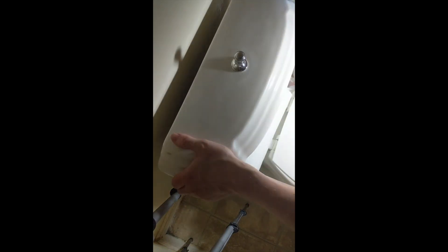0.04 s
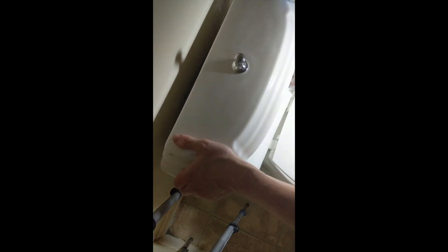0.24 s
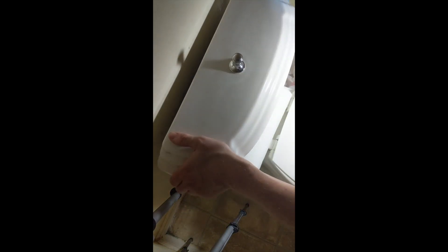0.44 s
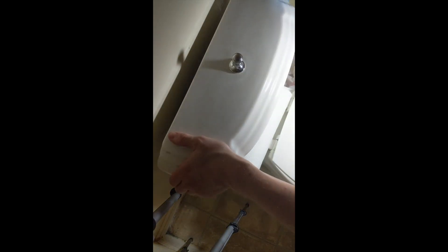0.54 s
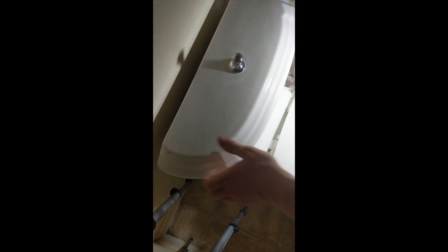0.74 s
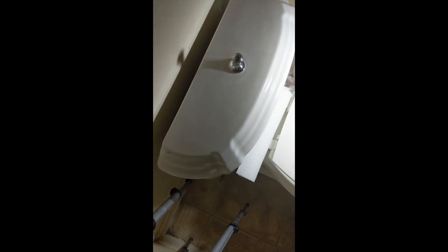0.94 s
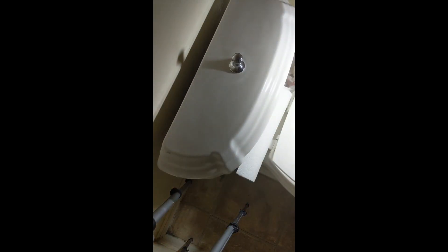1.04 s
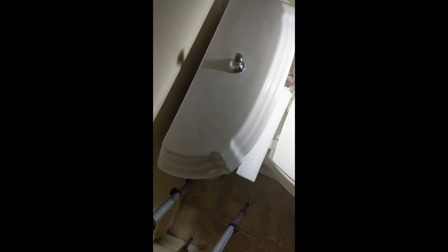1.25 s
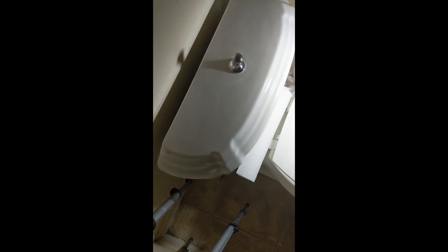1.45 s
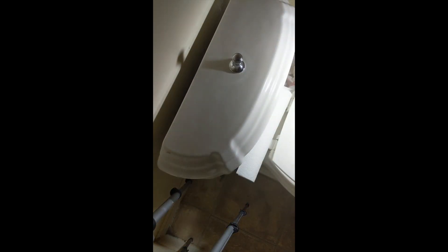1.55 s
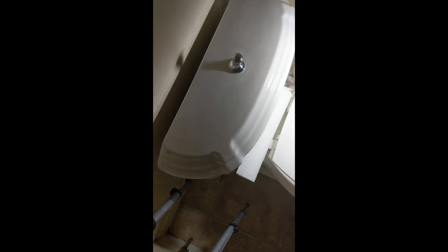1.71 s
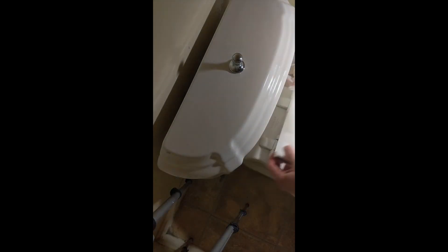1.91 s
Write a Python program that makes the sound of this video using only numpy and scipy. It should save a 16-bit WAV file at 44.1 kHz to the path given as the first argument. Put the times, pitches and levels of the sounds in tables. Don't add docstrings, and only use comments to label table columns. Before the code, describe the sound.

Four hard ceramic clunks in quick succession as a toilet tank lid settles onto its rim, after a short soft scrape; then near quiet with tiny drips, faint valve hiss and light finger taps, close-up in a tiled bathroom.

```python
import sys
import numpy as np
from scipy import signal
from scipy.fft import rfft, irfft, next_fast_len
from scipy.io import wavfile
from scipy.ndimage import uniform_filter1d, map_coordinates

SR = 44100
rng = np.random.default_rng(int(sys.argv[2]) if len(sys.argv) > 2 else 0)


def wrap_up_sound(samples):
    columns = np.atleast_2d(samples).T
    tamed = np.clip(columns, -1, 1)
    steps = np.round(tamed * 32767).astype(np.int16)
    wavfile.write(sys.argv[1], SR, steps)


def gain_from_db(level_db):
    decades = np.asarray(level_db, float) / 20
    return 10 ** decades


N = 85995

# pitch_hz, level_db (per Hz)
AIR_SPECTRUM = [(15, -62), (25, -17), (49, -0.5), (130, 2), (516, -12), (840, -15), (1790, -21),
                (3160, -20), (16000, -26.5)]
# pitch_hz, level_db
CAVITY_MODES = [(1020, 4.5), (1340, 5.5), (1800, 6.5), (2050, -3), (2350, -1.5), (3600, -2.5), (4600, -9)]
# pitch_hz, t60_s
TILE_DECAY = [(150, 0.38), (1000, 0.14), (4000, 0.17), (12000, 0.078)]
# pitch_hz, level_db (per Hz)
PHONE_FLOOR = [(20, 13), (60, -18), (100, -43)]
# start_s, peak_db, pitch_hz, t60_s
PLINK_EVENTS = [(.744, -58, 2230, 0.099), (.7453, -53.5, 2050, 0.19), (.976, -60.5, 2320, 0.071),
                (.985, -60.5, 2050, 0.2), (1.0422, -59.5, 2043, 0.1), (1.0422, -65, 1730, .08),
                (1.209, -59.5, 2360, 0.15), (1.22, -59.5, 2354, 0.28), (1.242, -60, 2054, 0.18),
                (1.285, -64, 2090, 0.055), (1.283, -65.5, 1520, 0.17), (1.326, -56, 2070, 0.09),
                (1.326, -57, 1600, .04), (1.328, -63, 2362, 0.11), (1.343, -61, 1710, 0.078),
                (1.4367, -60.5, 2350, .1), (1.781, -61, 2350, .06), (1.788, -51.5, 2076, 0.055),
                (1.812, -64, 2350, 0.23), (1.909, -62, 2330, 0.096), (1.9223, -53, 2350, .03)]
# start_s, peak_db, pitch_hz
DROPLET_EVENTS = [(0.0074, -46.5, 4420), (0.094, -46.5, 5380), (0.1024, -46.5, 7900), (0.154, -48.5, 11400),
                  (0.1753, -43.5, 11660), (0.642, -56, 7370), (0.6635, -57, 6640), (0.733, -52.5, 7330),
                  (0.7858, -51, 4680), (.8, -58, 4700), (0.85, -49.5, 8730), (1.152, -51, 9370),
                  (1.172, -55, 7180), (1.523, -51.5, 4680), (1.695, -56, 9330), (1.717, -57, 5260),
                  (1.757, -58, 5900), (1.8762, -50, 7320), (.353, -48, 3500), (.958, -56.5, 5300),
                  (.645, -57, 2900), (1.24, -58.5, 5870), (1.453, -58, 10400), (0.571, -65.5, 6120),
                  (.89, -61.5, 8100), (.535, -64, 8650)]
# start_s, level_db, pitch_hz
SPLASH_EVENTS = [(0.65, -64, 13500), (0.66, -52, 11570), (0.94, -65, 14000), (1.232, -63, 13500),
                 (1.341, -60, 13400), (1.418, -65, 15000), (1.435, -65, 15000), (1.452, -62.5, 7000),
                 (0.61, -67, 5600), (0.68, -69, 10400), (0.86, -56, 8640)]
# start_s, level_db, push_ms, ring_db
HAND_BUMPS = [(.108, -47.5, 1.6, -5), (1.5607, -55, 2.6, 6.5), (1.568, -54, 3, 0.5), (1.576, -58, 2.8, 5),
              (1.588, -48, 3.3, -7), (1.649, -54.5, 0.49, -0.5), (1.6546, -44.5, 1.2, -4),
              (1.663, -45, 2, -13), (1.6808, -48.5, 1.43, -6), (1.8785, -33, 3.74, -12),
              (1.899, -63, 2.7, -6)]
# pitch_hz, width_hz, level_db
FLESH_MODES = [(251, 99, 0.5)]
# pitch_hz, width_hz, level_db
TANK_MODES = [(155, 13, 0.5), (239, 17.6, 6.5), (294, 11, 1.5), (403.8, 4.8, 9.5), (454, 12, 4.5),
              (1117, 25, 2)]
# start_s, level_db, length_s
BRUSH_EVENTS = [
    (0.302, -52, 0.019),
    (0.35, -56, 0.02),
    (1.552, -63.5, 0.015),
    (1.63, -66, 0.041),
    (1.668, -66, 0.018),
    (1.86, -63.5, 0.045),
    (1.904, -67, 0.038),
]
# pitch_hz, level_db (per Hz)
SKIN_SPECTRUM = [(800, 0), (3000, -2.5), (16000, -8.5)]
# start_s, peak_db, pitch_hz
GLAZE_TICKS = [
    (1.5565, -60, 3950),
    (1.604, -55, 4340),
    (1.648, -61, 3650),
    (1.669, -54.5, 4500),
    (1.6704, -54, 6700),
    (1.886, -60, 3050),
    (1.9037, -50.5, 1600),
    (1.903, -56, 5760),
]
# start_s, scrape_db, palm_db
SLIDE_STROKE = [
    (0, -61.5, -68),
    (.04, -62, -69),
    (.09, -63.5, -58.5),
    (.115, -55.5, -70),
    (.16, -53.5, -69),
    (.19, -61.5, -58.5),
    (0.237, -58, -58.5),
]
# pitch_hz, level_db (per Hz)
GRIT_SPECTRUM = [(60, -38), (140, 2), (300, -27), (700, -36), (1300, -11.5), (2500, -21), (5000, -21),
                 (16000, -31.5)]
# pitch_hz, level_db (per Hz)
PALM_SPECTRUM = [(3000, -18), (8000, -1.5), (11500, 8), (16000, 8)]
# start_s, peak_db, contact_ms, clatter_db
CORNER_BLOWS = [
    (0.239, -14, 0.46, 2),
    (0.3166, -17.5, 1.1, 3),
    (0.3793, -15.5, 0.042, 2.5),
    (0.4272, -16, 0.02, 3.5),
]
# pitch_hz, level_db, t60_s
CORNER_MODES = [
    [(147, -18.5, 0.14), (284, -20, 0.032), (480.5, -5.5, 0.057), (600.5, -3.5, 0.047), (1147, 0.5, 0.044),
     (1301.3, -7, 0.18), (1557, -3.5, 0.07), (1830, -6.5, 0.041), (2360, -14, 0.046), (2438, -1.5, .11),
     (2702, 5.5, 0.029), (3040, -42, 0.09), (4409, -6, 0.023), (6160, -30, 0.11)],
    [(149.8, -4.5, 0.21), (300, -11, 0.094), (437, -13, 0.087), (459.8, 3.5, 0.088), (752, -18.5, 0.12),
     (890, -11, 0.045), (1055, 5, 0.034), (1203, -5, 0.1), (1290, 1.5, 0.17), (1540, -17, 0.02),
     (1790, -19, 0.11), (2040, -26, 0.052), (2440, -25, 0.26)],
    [(142.6, -16, 0.38), (453, -3.5, 0.1), (1121, 5, 0.047), (1290, -11, 0.3), (1768, -15, 0.093),
     (2450, -1.5, 0.12), (2765, 4.5, 0.037), (3540, -15.5, 0.038), (4400, -10, 0.098), (5630, -23.5, 0.077),
     (6067, -19, 0.1), (6821, -18, 0.073), (8080, -16.5, 0.076), (12000, -33, .04)],
    [(150.5, -2.5, 0.099), (103.3, -18, 0.52), (407, -18, 0.11), (1011.6, -10.5, 0.25), (1202, 8, 0.028),
     (1304, -0.5, 0.097), (1804, -3.5, 0.12), (2418, -1.5, 0.15), (2978, 5, 0.024), (3596, -6, 0.052),
     (2517, -8.5, 0.17), (230, -3, 0.048), (6300, -24, 0.097), (8053, -15, 0.043)],
]
# delay_s, level_db
CORNER_RETOUCHES = [
    [(0.0143, -10)],
    [],
    [],
    [(.0069, -7.5), (.0114, -9.5), (.0162, -6)],
]
# pitch_hz, level_db (per Hz)
CLATTER_SPECTRUM = [(85, -17), (150, 11), (600, 12), (1300, 15.5), (2600, 13), (5000, -0.5), (9000, -17.5),
                    (16000, -20)]
# pitch_hz, t60_s
CLATTER_DECAY = [(150, 0.1), (1500, 0.052), (5000, 0.096), (14000, 0.058)]

TOP_HZ = 16070


def unit(x):
    return x / np.sqrt(np.mean(x ** 2) + 1e-20)


def along(points, hz):
    f, v = np.transpose(points)
    return np.interp(np.log(hz + 1), np.log(f + 1), v)


def wobble(rate):
    knots = rng.standard_normal(int(N * rate / SR) + 4)
    return map_coordinates(knots, [np.arange(N) * rate / SR])


def filtered(x, response):
    m = next_fast_len(len(x) + SR // 2)
    return irfft(rfft(x, m) * response(np.fft.rfftfreq(m, 1 / SR)), m)[:len(x)]


def resonant(peaks):
    def response(f):
        total = 0
        for k, (centre, width, db) in enumerate(peaks):
            damping = 1j * f * width
            total = total + (-1) ** k * gain_from_db(db) * damping / (centre * centre - f * f + damping)
        return total
    return response


def add(track, s, sound):
    part = track[round(s * SR):][:len(sound)]
    part += sound[:len(part)]


def dying(t60s, colour):
    hz, t, z = signal.stft(rng.standard_normal(SR // 2), SR, nperseg=128)
    level_db = along(colour, hz)[:, None] - 60 * t / along(t60s, hz)[:, None]
    tail = signal.istft(z * gain_from_db(level_db), SR, nperseg=128)[1]
    return tail / np.linalg.norm(tail)


def patchy(spectrum, patchy_db):
    z = signal.stft(rng.standard_normal(N), nperseg=512)[2]
    field = uniform_filter1d(rng.standard_normal(z.shape), size=8, axis=0)
    field = uniform_filter1d(field, size=5, axis=1)
    x = signal.istft(z * gain_from_db(patchy_db * unit(field)), nperseg=512)[1][:N]
    return unit(filtered(x, lambda hz: gain_from_db(along(spectrum, hz))))


def air():
    hiss = patchy(AIR_SPECTRUM, patchy_db=1.58)
    flow = rng.standard_normal(N) * gain_from_db(4.2 * wobble(25.66))
    hollow = unit(filtered(flow, resonant([(hz, hz / 40, db) for hz, db in CAVITY_MODES])))
    return gain_from_db(-64.32) * (hiss + gain_from_db(-9) * hollow)


def room(x):
    out, hop = np.zeros(N), 2048
    for a in range(0, N, hop):
        tail = dying(TILE_DECAY, [(100, 0)])
        add(out, (a + 130) / SR, signal.fftconvolve(x[a:a + hop], tail))
    return out


def splash(db, hz):
    t = np.arange(SR // 16) / SR
    puff = filtered(rng.standard_normal(len(t)), resonant([(hz, 0.16 * hz, 0)]))
    return gain_from_db(db - 60 * t / 0.034) * (1 - np.exp(-t / 0.0022)) * unit(puff)


def spray():
    out = np.zeros(N)
    for s, db, hz in SPLASH_EVENTS:
        add(out, s, splash(db, hz))
    for when, pitch, energy in rng.random((70, 3)):
        hz = min(10400 * 2.2 ** (2 * pitch - 1.4), TOP_HZ)
        add(out, when * N / SR, splash(-79 + 5 * energy ** 2, hz))
    return out


def bubble(hz, t60, spread):
    t = np.arange(round(.15 * SR)) / SR
    near_hz = hz * (1 + spread * rng.standard_normal(4))
    gain = gain_from_db(-11.5 + 7.6 * rng.random(4))
    late_s = 0.013 * rng.random(4)
    main = np.sin(2 * np.pi * hz * t) * gain_from_db(-60 * t / t60) * (1 - np.exp(-t / 0.00069))
    u = np.maximum(t - late_s[:, None], 0)
    neighbours = np.sin(2 * np.pi * near_hz[:, None] * u) * gain_from_db(-60 * u / (0.41 * t60))
    return main + (gain[:, None] * neighbours).sum(0)


def water():
    out = spray()
    for s, db, hz, t60 in PLINK_EVENTS:
        add(out, s, gain_from_db(db - 3.0) * bubble(hz, t60, spread=0.045))
    for s, db, hz in DROPLET_EVENTS:
        add(out, s, gain_from_db(db - 6) * bubble(hz, 0.037, spread=0.04))
    for when, pitch, energy in rng.random((90, 3)):
        add(out, when * N / SR, gain_from_db(-78 + 7 * energy) * bubble(1400 * 4 ** pitch, .05, spread=.05))
    return out


def hand():
    thud, ring, puffs = np.zeros(N), np.zeros(N), np.zeros(N)
    t = np.arange(N) / SR
    for s, db, push_ms, ring_db in HAND_BUMPS:
        push = np.sin(np.pi * np.minimum(t[:SR // 10] / (push_ms / 1000), 1)) ** 2
        push = push / push.sum()
        add(thud, s, gain_from_db(db) * push)
        add(ring, s, gain_from_db(db + ring_db) * push)
    for s, db, length in BRUSH_EVENTS:
        onset = np.clip((t - s) / 0.0018, 0, 1)
        puffs += gain_from_db(db) * onset * np.exp(-((t - s) / length) ** 4)
    knocks = gain_from_db(41) * filtered(thud, resonant(FLESH_MODES)) + gain_from_db(47) * filtered(ring, resonant(TANK_MODES))
    return knocks + puffs * patchy(SKIN_SPECTRUM, patchy_db=2.5) * gain_from_db(1.55 * wobble(140))


def ticks():
    out, t = np.zeros(N), np.arange(SR // 20) / SR
    for s, db, hz in GLAZE_TICKS:
        snap = gain_from_db(-2 - 60 * t / 0.019) * rng.standard_normal(len(t))
        ring = gain_from_db(-60 * t / 0.016) * np.sin(2 * np.pi * hz * t)
        add(out, s, gain_from_db(db) * (ring + snap) * (1 - np.exp(-t / 0.00048)))
    return out


def slide():
    s, scrape_db, palm_db = np.transpose(SLIDE_STROKE)
    t = np.arange(N) / SR
    grit = patchy(GRIT_SPECTRUM, patchy_db=4.5) * gain_from_db(0.99 * wobble(122.6))
    body = [(hz, 45, level / 2) for hz, level, _ in CORNER_MODES[2]]
    rubbing = rng.standard_normal(N) * gain_from_db(4.4 * wobble(96.0))
    scrape = unit(grit) + gain_from_db(-1.5) * unit(filtered(rubbing, resonant(body)))
    palm = patchy(PALM_SPECTRUM, patchy_db=5.5) * gain_from_db(5.0 * wobble(63.2))
    stop_db = -400 * np.maximum(t - s[-1], 0)
    scrape_gain = gain_from_db(np.interp(t, s, scrape_db) + stop_db)
    palm_gain = gain_from_db(np.interp(t, s, palm_db) + stop_db)
    return scrape_gain * scrape + palm_gain * palm


def lid():
    out, t = np.zeros(N), np.arange(SR // 2) / SR
    for blow, modes, retouches in zip(CORNER_BLOWS, CORNER_MODES, CORNER_RETOUCHES):
        s, db, contact_ms, clatter_db = blow
        contact_s = contact_ms / 1000
        ring = sum(gain_from_db(level - 60 * t / t60) * np.sin(2 * np.pi * hz * t) for hz, level, t60 in modes)
        for late, less_db in [(0.000059, 0)] + retouches:
            rise_s = 0.0001 + 0.5 * contact_s + 0.0004 * (late > 0)
            clatter = 14 * gain_from_db(clatter_db) * dying(CLATTER_DECAY, CLATTER_SPECTRUM)[:len(t)]
            dull = filtered(clatter, lambda hz: 1 / (1 + 1j * hz * contact_s) ** 2)
            clunk = ring * (1 - np.exp(-t / rise_s)) + dull * (1 - np.exp(-t / 0.00057))
            add(out, s + late, gain_from_db(db - 8.5 + less_db) * clunk)
    seated = np.clip((np.arange(N) / SR - 0.4455) / 0.00055, 0, 1)
    return out * gain_from_db(-4 * seated)


def port(x):
    corner_hz, damping = 91.5, 1.273

    def bass_cut(hz):
        once = -hz * hz / (corner_hz ** 2 - hz * hz + 1j * damping * corner_hz * hz)
        return once ** 3

    return filtered(x, bass_cut) + gain_from_db(-86) * patchy(PHONE_FLOOR, patchy_db=-8)


def scene():
    near = lid() + slide() + hand() + ticks()
    wet = water()
    echo = room(gain_from_db(-12) * near + gain_from_db(-9.0) * wet)
    return port(near + wet + echo + air())[None]


def top_cut(x):
    return signal.sosfilt(signal.butter(12, 16800, fs=SR, output="sos"), x)


def record(dry):
    x = filtered(dry[0], lambda hz: gain_from_db(-np.maximum(hz - TOP_HZ, 0) / 14))
    return top_cut(x[None])


dry = scene()
out = record(dry)
wrap_up_sound(out)
```